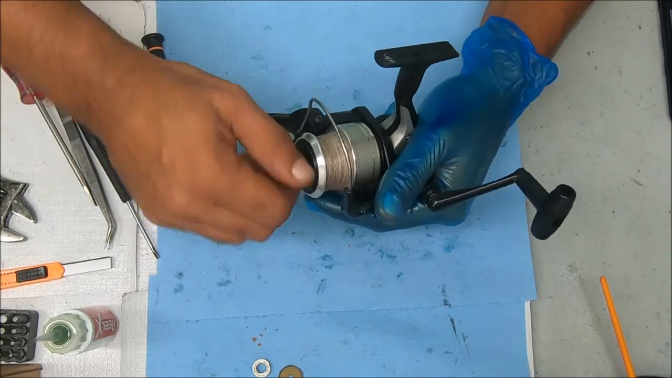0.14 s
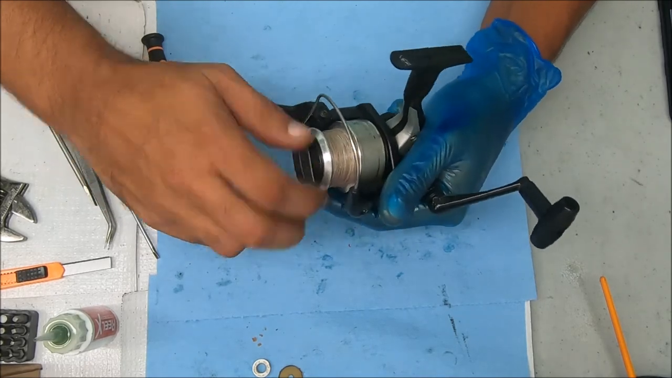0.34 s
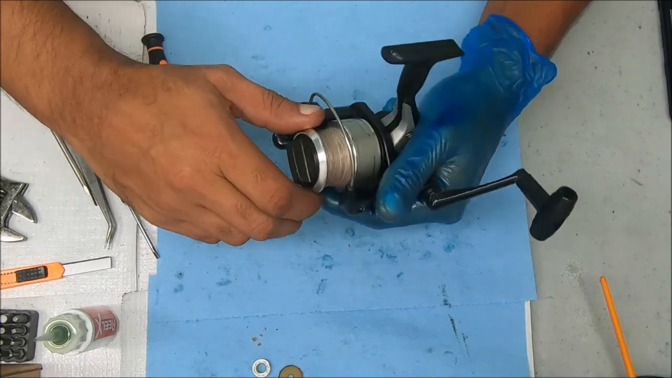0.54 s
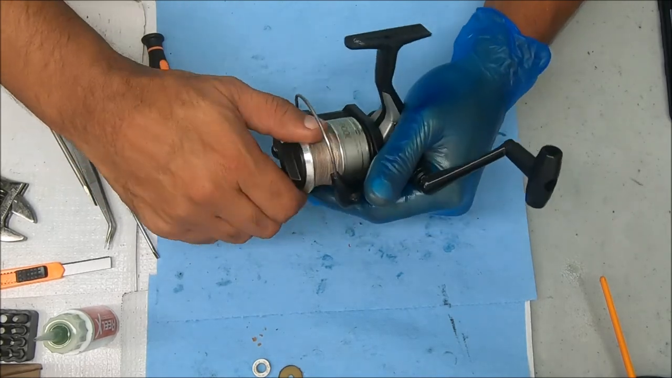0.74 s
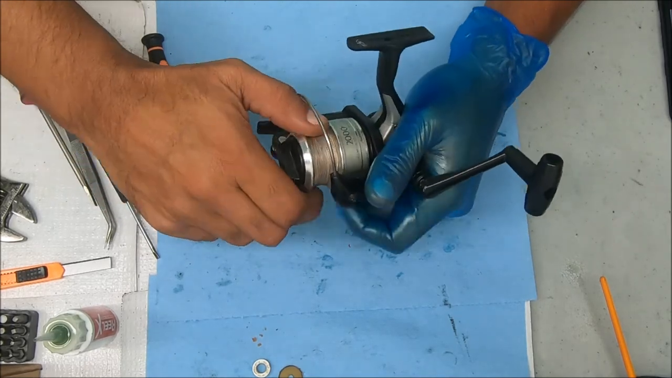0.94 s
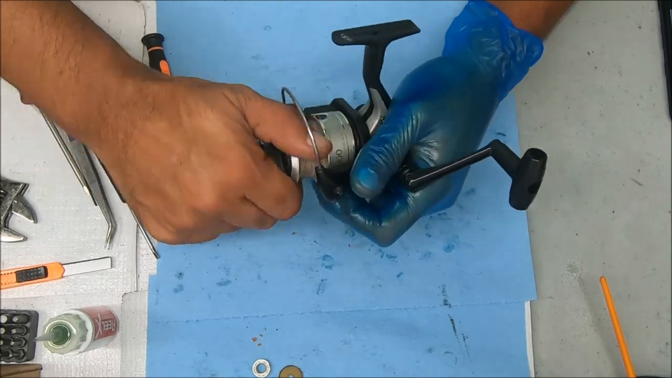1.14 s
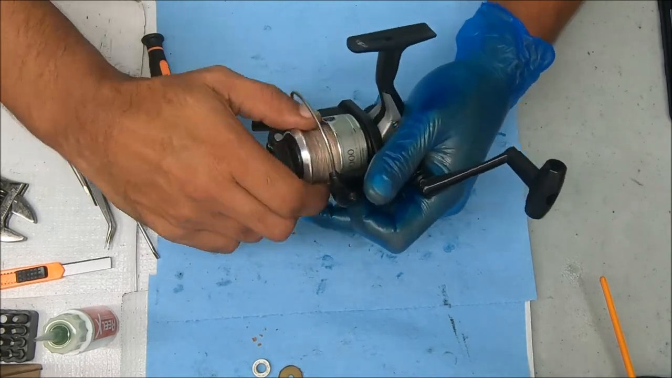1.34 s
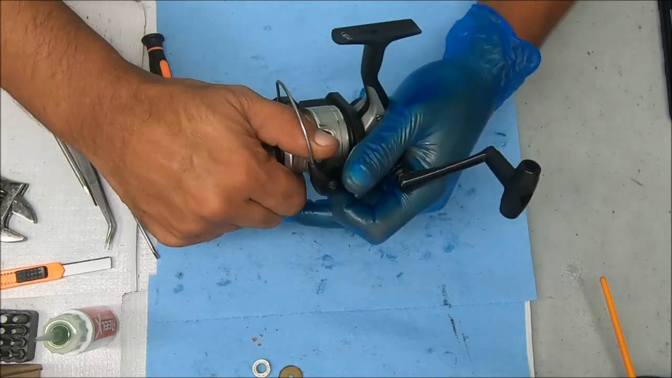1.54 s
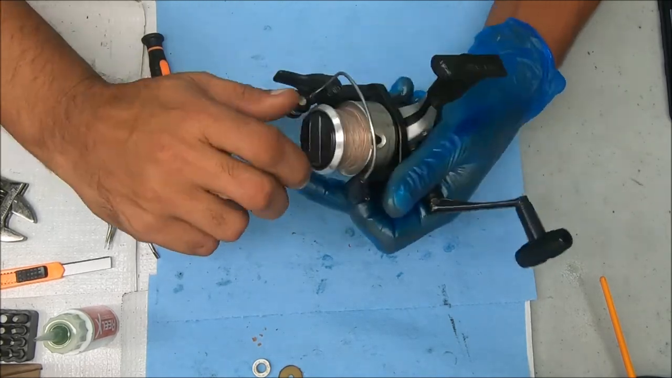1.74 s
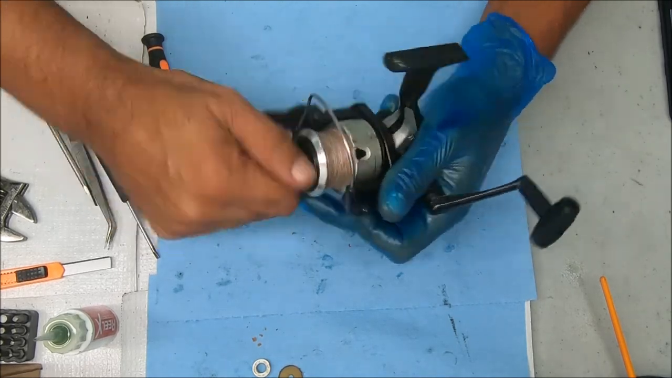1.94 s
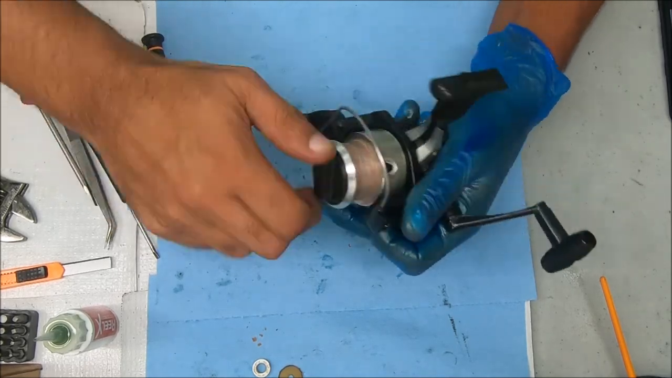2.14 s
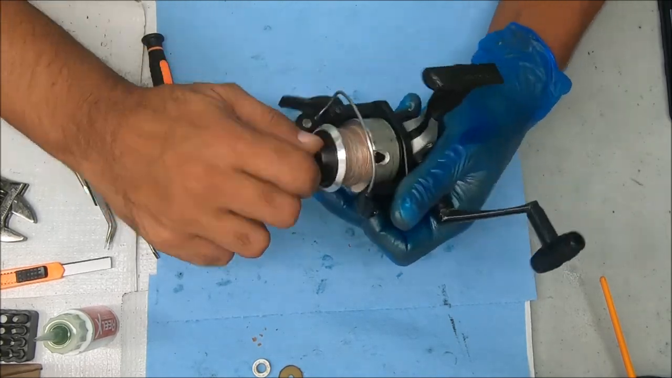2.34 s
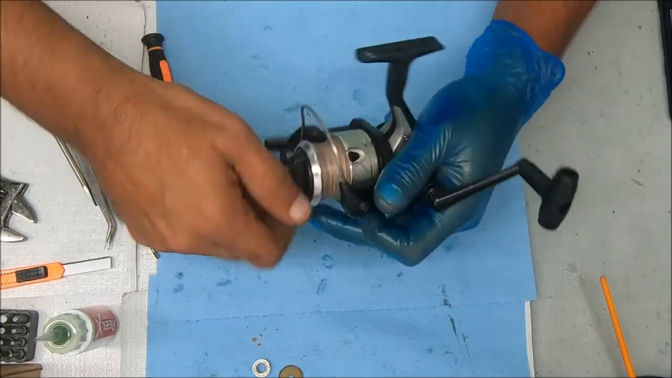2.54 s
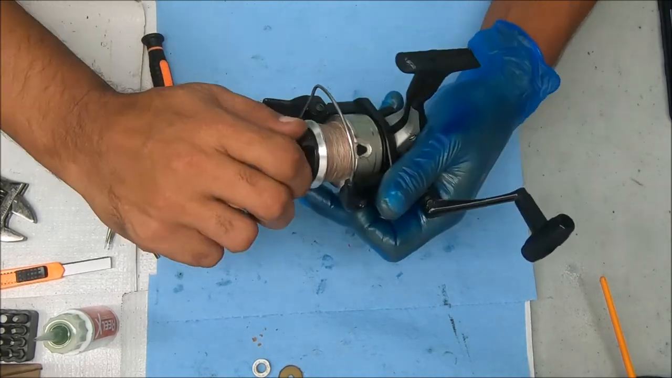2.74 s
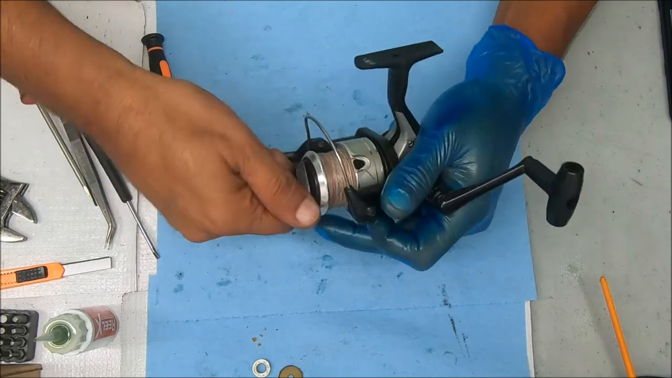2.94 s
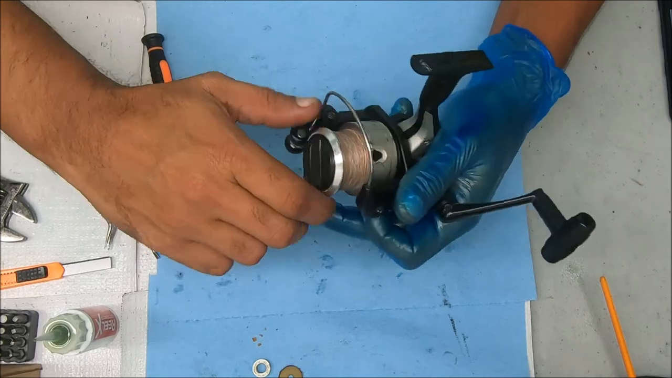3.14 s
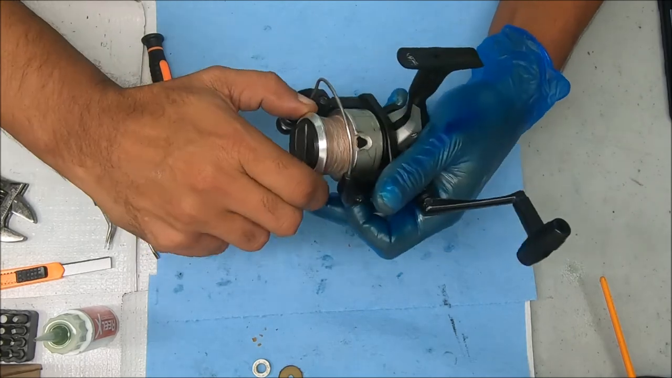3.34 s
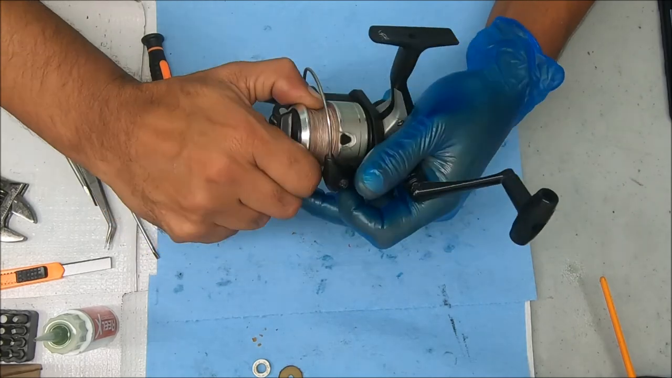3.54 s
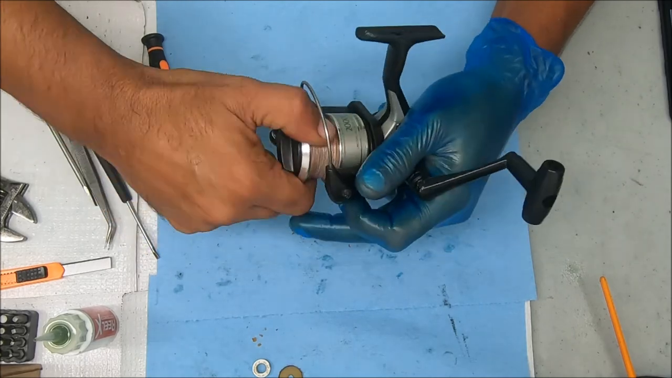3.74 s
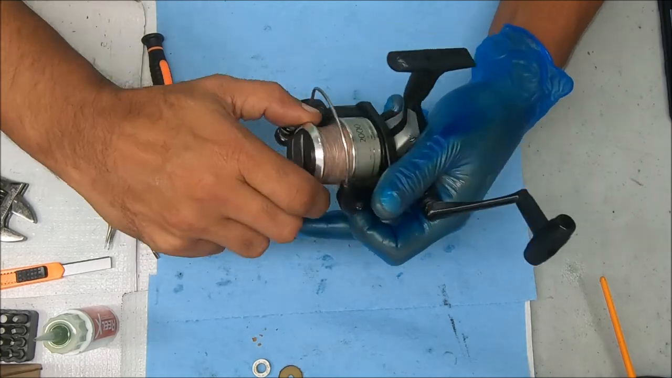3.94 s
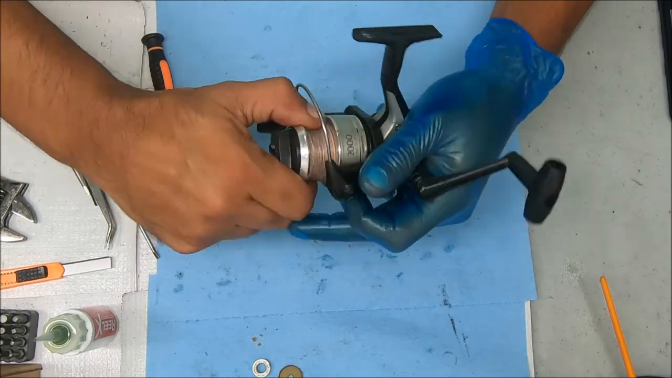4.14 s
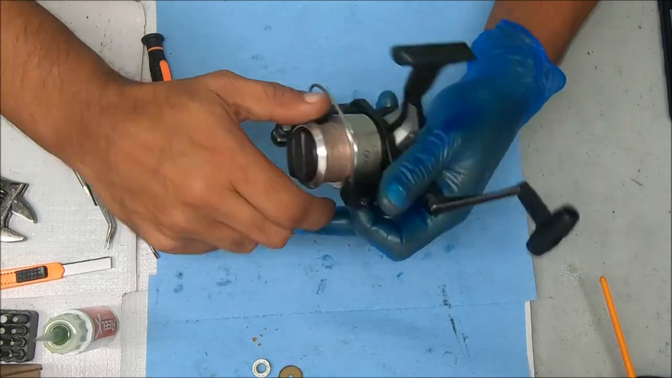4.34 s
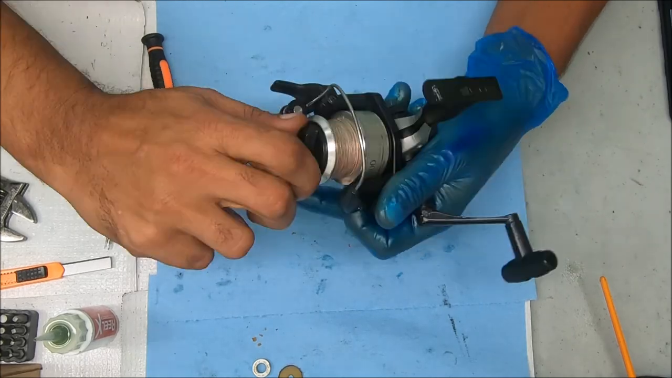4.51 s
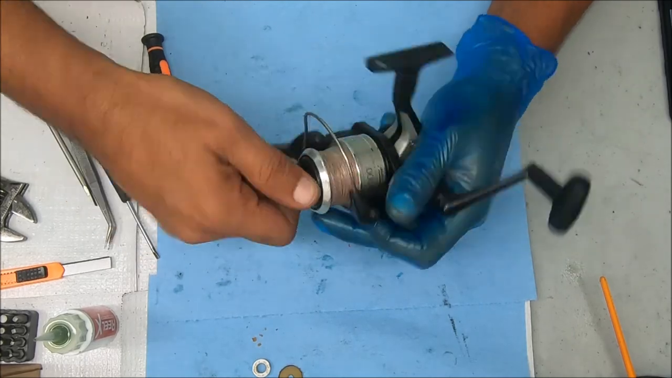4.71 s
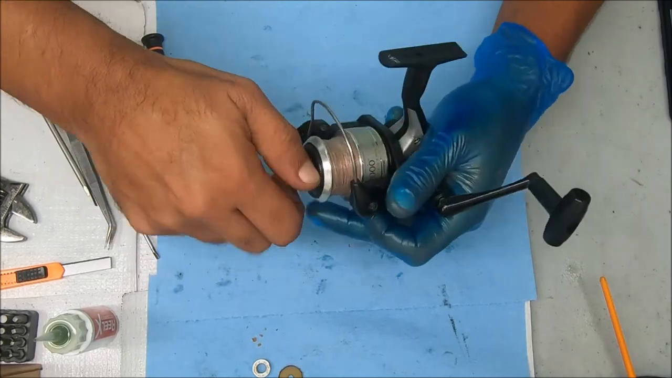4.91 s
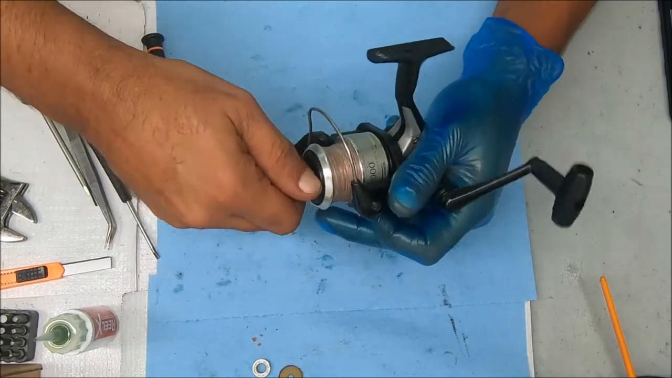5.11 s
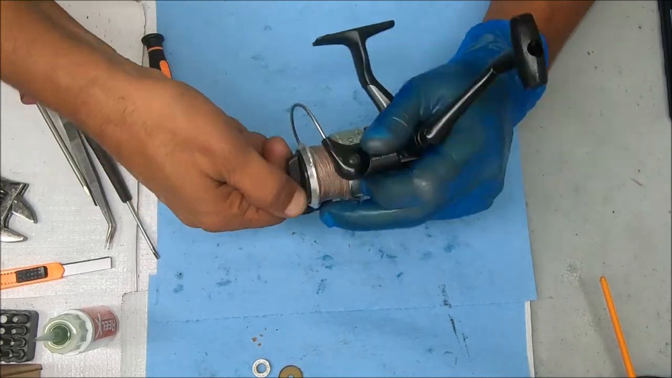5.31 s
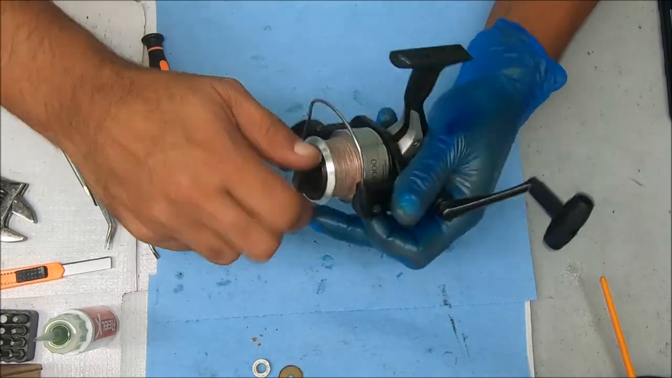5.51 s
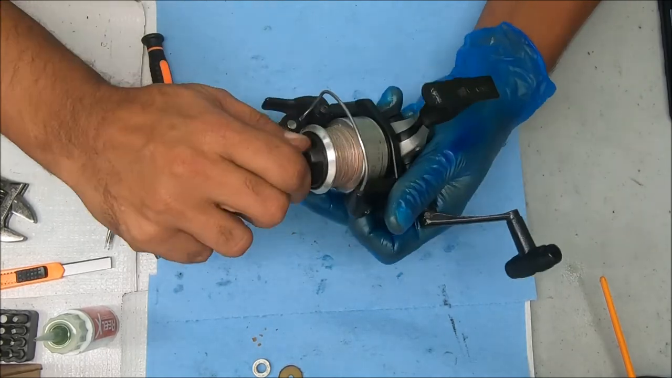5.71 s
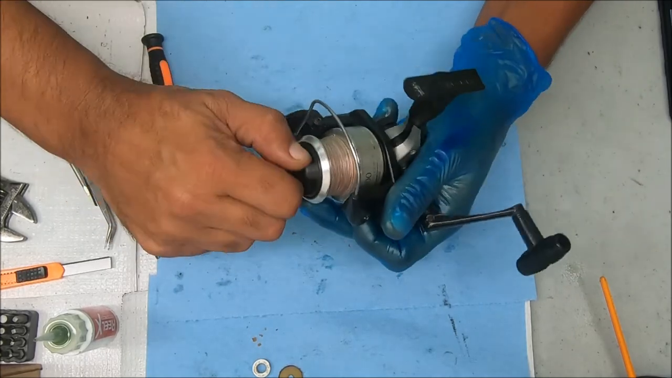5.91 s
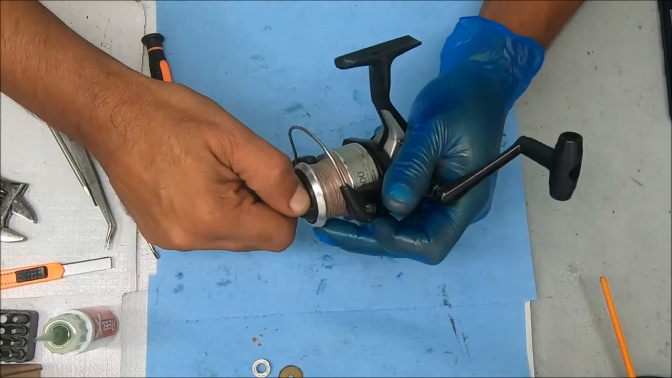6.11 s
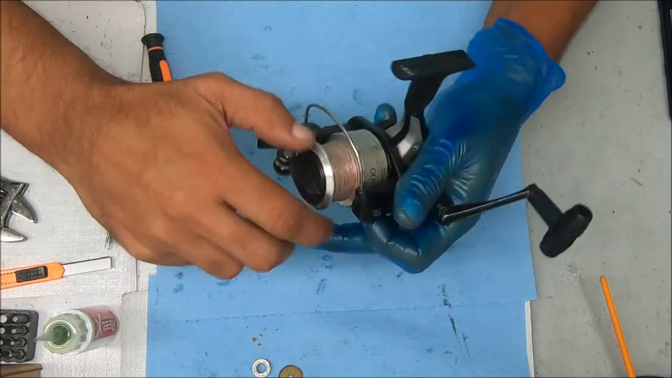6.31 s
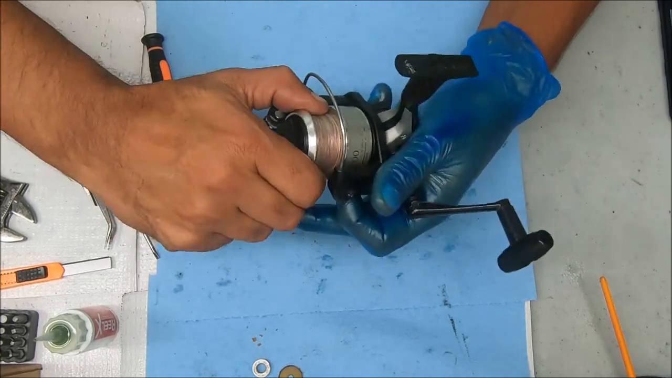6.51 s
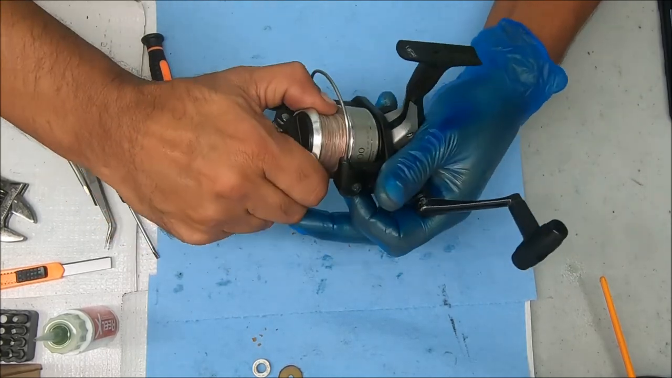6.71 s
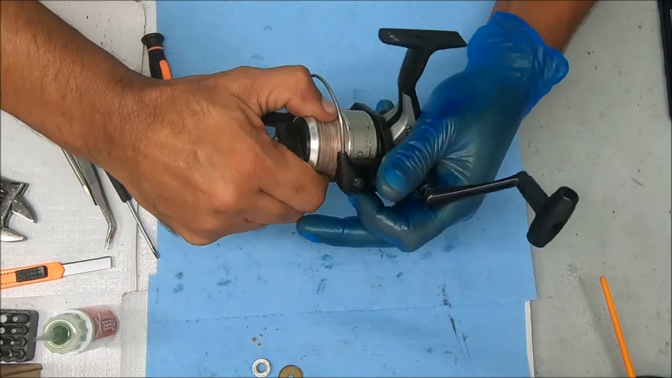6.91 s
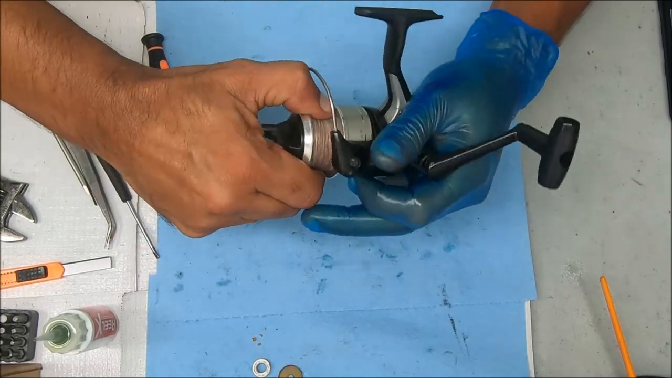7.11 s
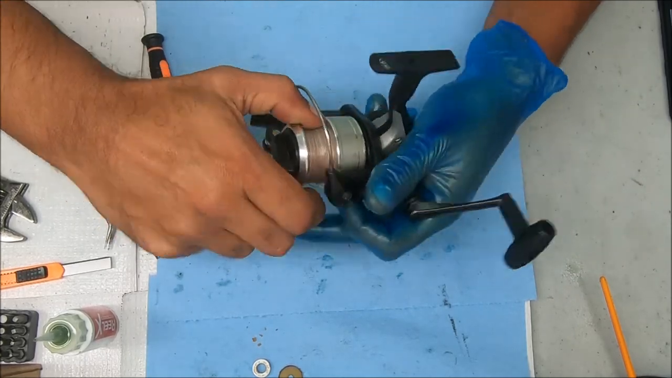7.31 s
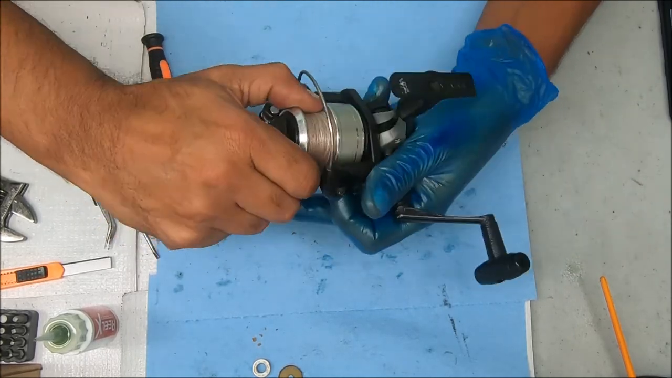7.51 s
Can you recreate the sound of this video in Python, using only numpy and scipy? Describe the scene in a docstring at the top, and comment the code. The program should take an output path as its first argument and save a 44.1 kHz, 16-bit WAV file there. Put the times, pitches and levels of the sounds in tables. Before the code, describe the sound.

A fishing reel is handled close to the microphone in a small workshop, over soft room noise and a faint, pulsing motor hum. A quick run of bright drag clicks comes at about 0.2 seconds, followed by soft knocks from the loose handle. From 0.8 to 1.6 seconds, fingers brush the wound line and slow pushes give single ticks with a thin wire ring. Three fast ratcheting bursts follow near 2, 2.5 and 3 seconds, with light knocks between them. A distant engine's low drone swells around 3 seconds, then sinks in pitch and fades. More single ringing ticks fall between 3.7 and 4.3 seconds. Another burst comes at 4.7, then sparser, weaker clicks near 5.3 and 6.1. Dry taps sound at 5.5 and 6.7 as the hand takes a new hold, with faint finger swishes and one last tick around 7 seconds.

```python
"""Spinning reel in a small workshop.

Close to the microphone, a hand turns the spool in short twists and slow thumb pushes, and the drag's
spring pawl snaps over the ratchet teeth. In between, the loose handle knocks in the housing, fingers
brush the wound line and take a new hold. Behind, a motor's hum beats against the mains and an engine
passes far off."""
import sys
import numpy as np
from scipy import signal
from scipy.fft import rfft, irfft
from scipy.io import wavfile
from scipy.ndimage import uniform_filter1d

SR = 44100
rng = np.random.default_rng(int(sys.argv[2]) if len(sys.argv) > 2 else 0)


def wrap_up_sound(samples):
    """Save the sound to the file named by the first command line argument, as 16-bit audio."""
    columns = np.atleast_2d(samples).T
    # keep every value between -1 and 1, then stretch to whole-number steps
    tamed = np.clip(columns, -1, 1)
    steps = np.round(tamed * 32767).astype(np.int16)
    wavfile.write(sys.argv[1], SR, steps)


N = 333307

# Modes of the reel's body. Each row: frequency in Hz, relative level in dB, seconds to die by 60 dB.
HOUSING_MODES = [(1439, -9.5, 0.013), (1586, -2, 0.02), (1730, 2, 0.023), (2305, -3, 0.0072),
                 (2548, -7.5, 0.022)]
ROTOR_MODES = [(2560, -5.5, 0.0055), (2790, -6, .007), (3260, 1.5, 0.015), (3516, 2, 0.01),
               (3570, -5, 0.02)]
# Spectra of a dry tick and the pawl's bright crack. Each row: frequency in Hz, relative level in dB.
TICK_SPECTRUM = [(500, -15.5), (900, -5), (1300, -5.5), (2400, 1.5), (3700, -4), (4600, -9), (5400, -21),
                 (7500, -7.5), (10000, -22), (16000, -39)]
CRACK_SPECTRUM = [(600, -43.5), (1100, -20.5), (1400, -25), (4200, -10.5), (6000, -3.5), (8500, 6),
                  (9400, 5.5), (10400, 1.5), (13200, 0.5), (14300, -5), (15500, -2.5)]
# Slow thumb pushes on the line. Each row: time in seconds, relative levels of click and bail wire in dB.
THUMB_PUSHES = [(0.8834, -33.5, -59), (1.2045, -32, -61), (1.2474, -32.5, -49.5), (1.563, -32.5, -41),
                (1.6063, -34.5, -44), (3.7011, -32.5, -43.5), (3.7486, -32, -56), (3.8195, -32.5, -45.5),
                (4.2396, -33.5, -44.5), (4.288, -33, -45), (7.0678, -33.5, -53.5)]


def amp(db):
    """Decibels to gain."""
    return 10 ** (np.asarray(db) / 20)


def value_at(points, hz):
    """A table's value at hz, on a log-frequency axis."""
    table_hz, values = np.transpose(points)
    return np.interp(np.log(hz + 1), np.log(table_hz + 1), values)


def add(mix, start_s, sound):
    """Mixes a sound in from start_s on."""
    part = mix[max(round(start_s * SR), 0):][:len(sound)]
    part += sound[:len(part)]


def low_cut(x, hz, order):
    """Takes out the bass below hz."""
    return signal.sosfilt(signal.butter(order, hz, "high", fs=SR, output="sos"), x)


def noise(spectrum):
    """Steady noise of rms 1 with the given spectrum."""
    gain = amp(value_at(spectrum, np.fft.rfftfreq(N, 1 / SR)))
    x = irfft(rfft(rng.standard_normal(N)) * gain, N)
    return x / x.std()


def impulse(spectrum):
    """The shortest one-sided impulse response with the given spectrum."""
    log_gain = np.log(amp(value_at(spectrum, abs(np.fft.fftfreq(1024, 1 / SR)))))
    minimum_phase = np.exp(np.conj(signal.hilbert(log_gain)))
    return np.fft.ifft(minimum_phase).real


def ring(modes, detune):
    """Dying modes of alternating sign; the grip of the hand shifts them a little from blow to blow."""
    hz, db, t60 = np.transpose(modes)[:, :, None]
    t = np.arange(9000) / SR
    shifted_hz = hz * (1 + detune * rng.standard_normal(hz.shape))
    partials = amp(db - 60 * t / t60) * np.sin(2 * np.pi * shifted_hz * t)
    return (-1) ** np.arange(len(hz)) @ partials


def strike(response, chatter_db, chatter_s):
    """One sharp contact and a chatter of uneven length excite a response; rms 1 over the first 8 ms."""
    t = np.arange(400) / SR
    decay_s = chatter_s * np.exp(.35 * rng.standard_normal())
    chatter = rng.standard_normal(len(t)) * np.exp(-t / decay_s)
    force = signal.unit_impulse(len(t)) + amp(chatter_db) * chatter / np.linalg.norm(chatter)
    x = signal.fftconvolve(force, response)
    return x / np.sqrt(np.mean(x[:round(.008 * SR)] ** 2))


def room_tone(air_db=-58.5):
    """The workshop's steady air and low rumble, as mid and side signals."""
    # Each row: frequency in Hz, relative level in dB.
    air_spectrum = [(90, -36), (150, 2.5), (280, -1), (400, -2), (520, -2), (700, -8.5), (900, -6),
                    (1200, -11), (2500, -15.5), (4200, -21), (8000, -21), (12000, -24), (15500, -26)]
    rumble_spectrum = [(2, -7.5), (6, 0.5), (13, -5), (22, 2), (32, -2.5), (44, 0.5), (55, -10.5),
                       (72, -13), (90, -17), (125, -17.5), (150, -21), (200, -64)]
    mid = amp(air_db) * noise(air_spectrum) + amp(-42.5) * noise(rumble_spectrum)
    return mid, amp(air_db - 30) * noise(air_spectrum)


def hum(shaft_hz=58.512, mains_hz=59.963, in_step_s=.257):
    """An induction motor slips just behind the mains, so their hums beat about three times a second."""
    # Each row: multiple of the shaft speed, level in dB.
    motor_harmonics = [(2, -48.5), (4, -95.5), (5, -71.5), (6, -73), (9, -70.5)]
    # The building's slow throb. Each row: frequency in Hz, level in dB.
    throb_tones = [(12.2, -38.5), (43.5, -49.5)]
    t = np.arange(N) / SR
    phase_per_hz = 2 * np.pi * (t - in_step_s)
    motor = sum(amp(db) * np.cos(k * shaft_hz * phase_per_hz) for k, db in motor_harmonics)
    mains = amp(-50.5) * np.cos(2 * mains_hz * phase_per_hz)
    throb = sum(amp(db) * np.sin(2 * np.pi * (hz * t + rng.random())) for hz, db in throb_tones)
    return np.sqrt(2) * (motor + mains + throb)


def handle():
    """Slack in the gears is taken up with soft knocks, shared between housing and rotor, over a tick."""
    # Each row: start in seconds, relative ring level in dB, rotor's lead over housing in dB.
    knocks = [(0.0113, -44, -10), (.0687, -53, 2), (0.429, -51.5, -7), (0.4605, -46, -25),
              (0.4891, -40, -6), (1.3314, -54, -8), (1.8388, -51, -1.5), (1.903, -39.5, 9.5),
              (2.218, -52.5, -2), (2.2527, -53, -16), (2.326, -52.5, -25), (2.3716, -50, 12.5),
              (2.6727, -35, -8.5), (2.8127, -51.5, -5.5), (2.8388, -35, 19), (4.3787, -56.5, -28)]
    out, tick = np.zeros(N), impulse(TICK_SPECTRUM)
    for s, db, lead_db in knocks:
        balance = np.arctan(amp(lead_db))
        for modes, share in (HOUSING_MODES, np.cos(balance)), (ROTOR_MODES, np.sin(balance)):
            knock = strike(ring(modes, detune=.015), chatter_db=4.5, chatter_s=.0018)
            add(out, s, amp(db) * share * knock)
        tick_db = db - 7 - .52 * max(lead_db, 0)  # weaker where the rotor leads
        add(out, s, amp(tick_db) * strike(tick, chatter_db=21, chatter_s=.0032))
    return out


def drag_ratchet():
    """The pawl drops off each tooth: a crack, its spring's two bands of modes, and the body answers."""
    # Quick fingertip twists. Each row: start in seconds, relative crack level in dB,
    # how freely the body rings in the grip in dB.
    twists = [(.14, -34.5, 2.5), (1.95, -36, 3.5), (2.38, -34, 2.5), (2.9, -34, 2), (4.69, -34, -6.5),
              (5.25, -32, -4), (6.02, -32.5, -26)]
    # Teeth passed. Each row: start in seconds, relative spring level in dB, overtones over spring in dB.
    teeth = [(0.1606, -32, 0), (0.1842, -24, -9), (0.1964, -28.5, 5.5), (0.2115, -45, -24),
             (0.2343, -28, 0.5), (0.2587, -28.5, -8.5), (0.2881, -30, -1.5), (1.9736, -27.5, 5),
             (1.9873, -28, -11.5), (2.0008, -22, -3.0), (2.0152, -26, 0.5), (2.032, -24, -8),
             (2.0513, -28, 2), (2.0704, -27, -4), (2.0902, -30, 2), (2.4071, -27.5, -4),
             (2.437, -21.5, -13), (2.4603, -24.5, -3), (2.479, -32.0, -2.5), (2.4949, -28.0, 0),
             (2.5084, -23, 0), (2.5212, -28.5, -8), (2.5338, -26, 0), (2.5536, -26, -5.5),
             (2.9187, -29, -11), (2.9377, -22.5, -11.5), (2.9534, -29.5, -17), (2.9703, -26, -1.5),
             (2.9922, -25, -6.5), (3.0145, -24.5, -3), (4.718, -26.5, -6.5), (4.746, -27.5, -28),
             (4.775, -28, -9), (4.796, -25.5, -24.5), (4.814, -22, -7), (4.837, -31, -4.5),
             (5.2762, -35, -4), (5.3428, -37.5, 8), (5.375, -36.0, -8.5), (5.4184, -56, -2.0),
             (6.0491, -34.5, -7), (6.0984, -47, 9), (6.17, -31, 2)]
    # Spool rim and pawl spring. Each row: frequency in Hz, relative level in dB, 60 dB decay in seconds.
    rim_modes = [(5070, -2, .006), (5420, 2, 0.0038), (5720, -1.5, 0.0088)]
    spring_modes = [(6450, -7.5, 0.0066), (7120, -1.5, 0.0081), (7706, 1, 0.0082), (7680, 2, 0.006),
                    (7800, 0.5, .006)]
    spring_overtones = [(11800, -0.5, 0.0054), (12200, -3.5, 0.0065), (12520, -7.5, .006),
                        (12640, -2, 0.0057)]
    out, crack = np.zeros(N), impulse(CRACK_SPECTRUM)
    twist_of_tooth = np.searchsorted(np.transpose(twists)[0], np.transpose(teeth)[0]) - 1
    new_twist = np.diff(twist_of_tooth, prepend=-1, append=len(twists)) > 0
    # A twist's first and last tooth jolt the spool: more goes into rotor and rim, less into the crack.
    jolts = new_twist[:-1] | new_twist[1:]
    for (s, spring_db, bright_db), twist, jolt in zip(teeth, twist_of_tooth, jolts):
        _, crack_db, free_db = twists[twist]
        landing = strike(crack, chatter_db=11, chatter_s=.0006)
        rattle = amp(3) * strike(crack, chatter_db=22.5, chatter_s=.003)
        add(out, s, amp(crack_db - 2.5 * jolt) * (landing + rattle))
        # Every tooth is equally deep, so only grip and jolt change the body's levels.
        housing_db = -42 + .12 * free_db
        rotor_db = -51.5 + 8.5 * jolt + free_db
        rim_db = -48.5 + 7.5 * jolt + free_db
        housing = strike(ring(HOUSING_MODES, detune=.029), chatter_db=-6, chatter_s=.00085)
        rotor = strike(ring(ROTOR_MODES, detune=.017), chatter_db=-6.5, chatter_s=.001)
        add(out, s, amp(housing_db) * housing + amp(rotor_db) * rotor)
        parts = (rim_modes, rim_db), (spring_modes, spring_db), (spring_overtones, spring_db + bright_db)
        for modes, db in parts:
            velocity = np.diff(ring(modes, detune=.016))  # small metal parts radiate by their speed
            add(out, s, amp(db) * strike(velocity, chatter_db=-1.5, chatter_s=.002))
    return out


def fingers(grain_db=4, slip_s=.038, slip_db=-23.5):
    """Skin slides over the wound line with a grainy swish; the thumb also slips at each push."""
    # Each row: midpoint in seconds, length in seconds, relative level in dB.
    rubs = [(0.797, 0.092, -58.5), (1.013, 0.023, -53.5), (1.15, 0.11, -59), (5.814, 0.03, -53.5),
            (6.371, 0.064, -60), (7.358, .068, -63.5)]
    t = np.arange(N) / SR
    slips = [(s, slip_s, db + slip_db) for s, db, _ in THUMB_PUSHES]
    strokes = sum(amp(db) * np.exp(-(2 * (t - s) / length) ** 2) for s, length, db in rubs + slips)
    # Each row: frequency in Hz, relative level in dB.
    swish_spectrum = [(600, -18), (1700, -6.5), (4000, -5), (5100, -6.5), (7000, -1), (9300, 2.5),
                      (12000, -9.5), (16000, -18)]
    grain = uniform_filter1d(rng.standard_normal(N), size=90)
    return amp(-2) * strokes * noise(swish_spectrum) * amp(grain_db * grain / grain.std())


def thumb_pushes():
    """Pushed slowly, the pawl lands softly; the spool rings and the bail wire sings on after it."""
    # Each row: frequency in Hz, relative level in dB, 60 dB decay in seconds.
    spool_modes = [(1708, -6.5, 0.05), (3400, -3, 0.023), (4970, -0.5, 0.018), (5295, 11, 0.013),
                   (7770, -1, 0.0063), (7800, -20, 0.0065), (7760, 14, 0.0061), (9770, -6, 0.014),
                   (11600, -17, 0.0058), (11830, 2, 0.012), (13900, -2, 0.011)]
    bail_modes = [(4764, 0, .17), (8382, -17, .15), (9308, -14, .17)]
    out, crack, tick = np.zeros(N), impulse(CRACK_SPECTRUM), impulse(TICK_SPECTRUM)
    for s, db, bail_db in THUMB_PUSHES:
        add(out, s, amp(db - 2.5) * strike(crack, chatter_db=12, chatter_s=.0036))
        add(out, s, amp(db - 16.5) * strike(tick, chatter_db=4, chatter_s=.0044))
        spool = strike(ring(spool_modes, detune=.0037), chatter_db=-9, chatter_s=.00049)
        bail = strike(ring(bail_modes, detune=.0005), chatter_db=-14.5, chatter_s=.00089)
        add(out, s, amp(db - 5.5) * spool + amp(bail_db) * bail)
    return out


def far_engine(peak_s=3.13, hold_s=.4, pass_s=.85, rise_db_per_s=58.5, fade_db_per_s=10.5):
    """A far engine's drone swells, holds, and sinks in pitch as it goes by and fades."""
    t = np.arange(N) / SR - peak_s
    leaving_s = t - hold_s
    db = -40.5 + rise_db_per_s * np.minimum(t, 0) - fade_db_per_s * np.maximum(leaving_s, 0)
    hz = 68.5 - 7.3 * np.tanh(leaving_s / pass_s)
    return np.sqrt(2) * amp(db) * np.sin(2 * np.pi * np.cumsum(hz) / SR)


def new_hold():
    """The hand lands on the reel and damps it at once: a dry tick with no ring."""
    # Each row: start in seconds, relative level in dB.
    taps = [(5.5303, -40.5), (5.6613, -55.5), (6.7446, -43.5)]
    out, tick = np.zeros(N), impulse(TICK_SPECTRUM)
    for s, db in taps:
        add(out, s, amp(db) * strike(tick, chatter_db=22, chatter_s=.0021))
    return out


def reflections(first_s=.003, build_s=.0032):
    """Dense reflections build up after the first one from the bench and die band by band."""
    # The workshop's ring. Each row: frequency in Hz, 60 dB decay in seconds.
    decay_times = [(1200, .22), (3200, 0.29), (7500, 0.27), (12000, 0.25), (16000, 0.067)]
    t = np.arange(SR // 2) / SR
    echoes = np.sign(rng.standard_normal(len(t))) * (rng.random(len(t)) < .15)
    build_up = np.clip((t - first_s) / build_s, 0, 1)
    hz, age_s, bands = signal.stft(echoes * build_up, SR, nperseg=256)
    decay = amp(-60 * age_s / value_at(decay_times, hz)[:, None])
    tail = signal.istft(bands * decay, SR, nperseg=256)[1]
    return tail / np.linalg.norm(tail)


def workshop(reel, directions=4, crossfade_hz=13):
    """The reel turns in the hands, so each click meets another blend of reflections."""
    cycles = crossfade_hz * np.arange(N) / SR
    facing = [np.maximum(np.cos(2 * np.pi * (cycles + k / directions)), 0) for k in range(directions)]
    return sum(signal.oaconvolve(reel * share, reflections())[:N] for share in facing)


def scene():
    """The reel close up and centred, the workshop behind it, nearly alike in both channels."""
    # So small a body radiates little bass.
    ratchet = low_cut(drag_ratchet(), hz=1300, order=4)
    handling = low_cut(thumb_pushes() + handle() + new_hold(), hz=800, order=2)
    reel = ratchet + handling + fingers()
    room_mid, room_side = room_tone()
    background = room_mid + hum() + far_engine()
    mid = reel + amp(-9) * workshop(reel) + background
    side = amp(-36) * signal.oaconvolve(reel, reflections())[:N] + room_side
    return np.array([mid + side, mid - side])


def record(dry):
    """The recorder cuts the treble above about 16 kHz."""
    lowpass = signal.firwin(255, 15950, window=("kaiser", 8), fs=SR)
    return signal.oaconvolve(dry, lowpass[None], "same")


dry = scene()
out = record(dry)
wrap_up_sound(out)
```